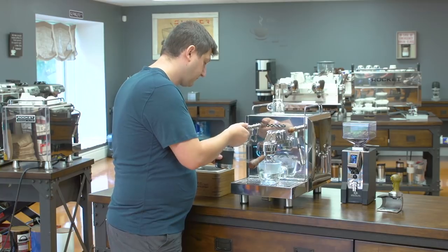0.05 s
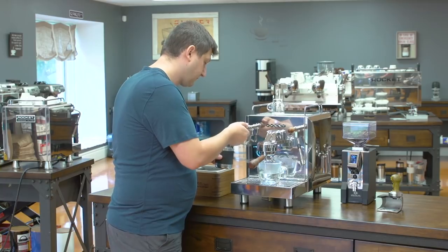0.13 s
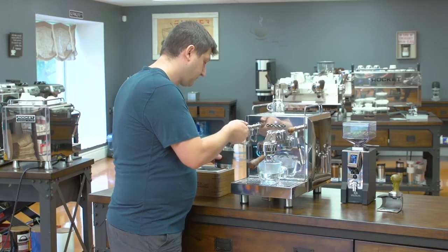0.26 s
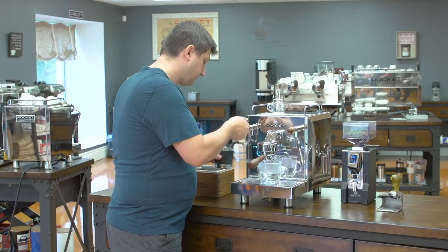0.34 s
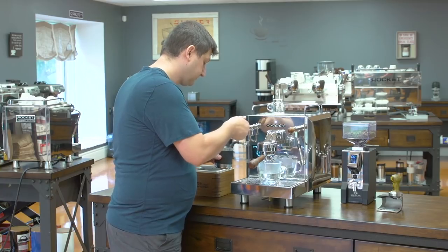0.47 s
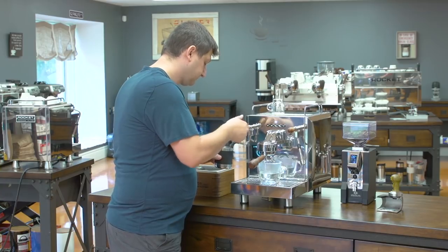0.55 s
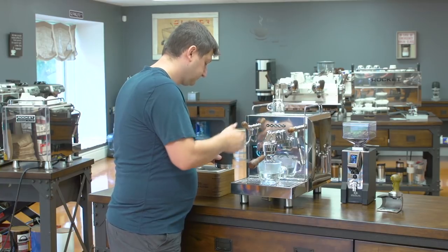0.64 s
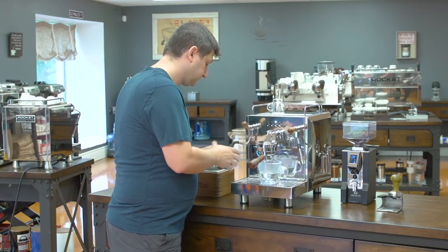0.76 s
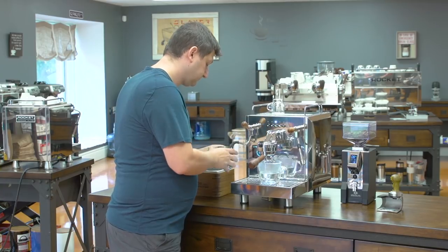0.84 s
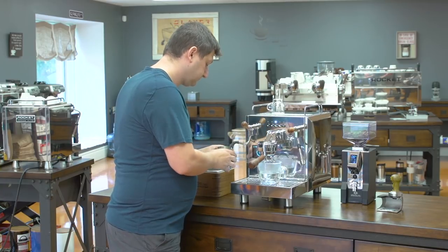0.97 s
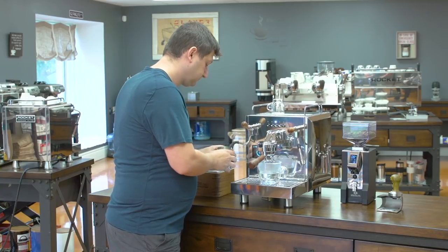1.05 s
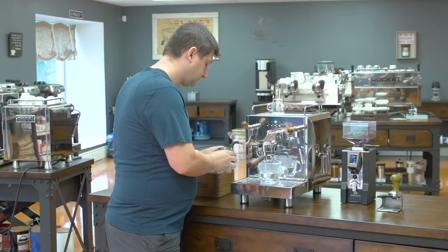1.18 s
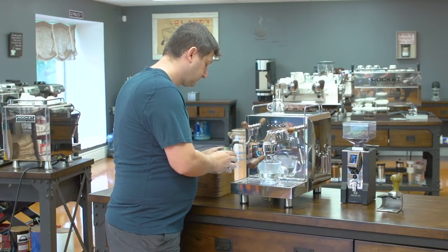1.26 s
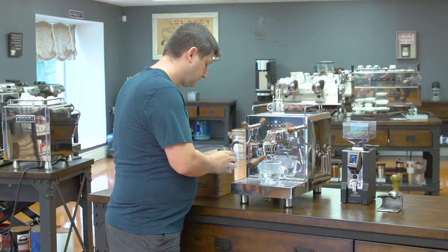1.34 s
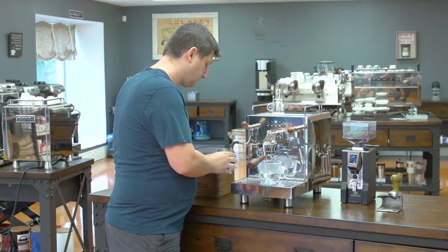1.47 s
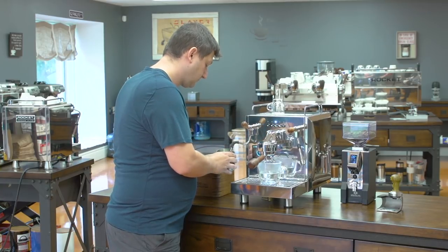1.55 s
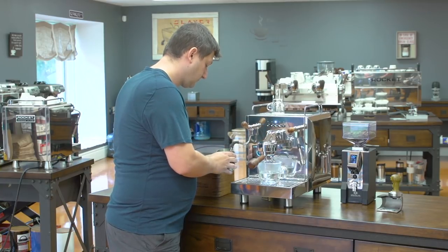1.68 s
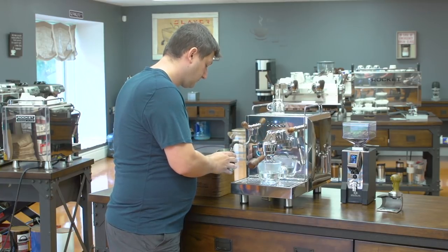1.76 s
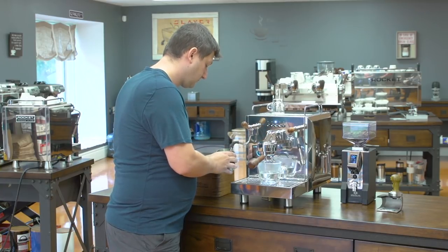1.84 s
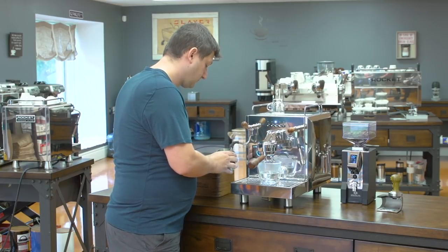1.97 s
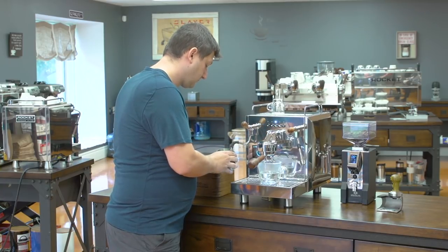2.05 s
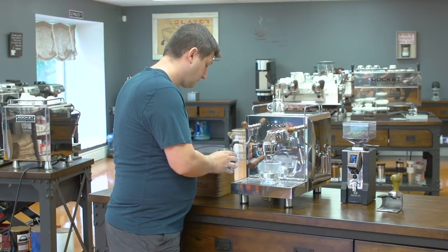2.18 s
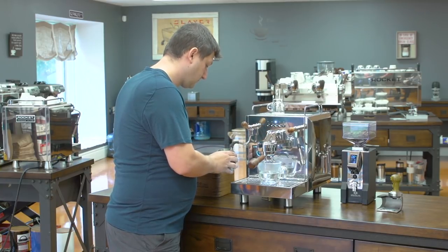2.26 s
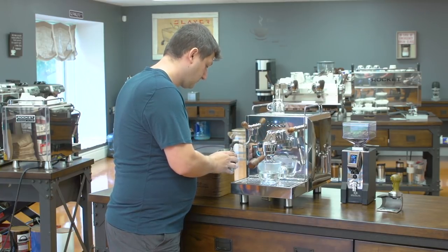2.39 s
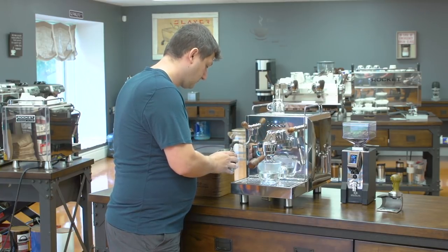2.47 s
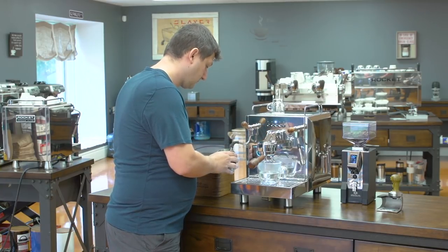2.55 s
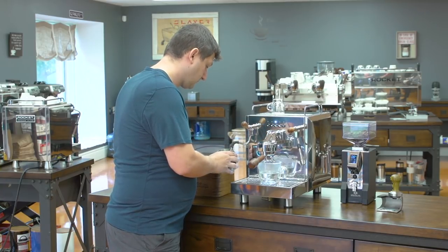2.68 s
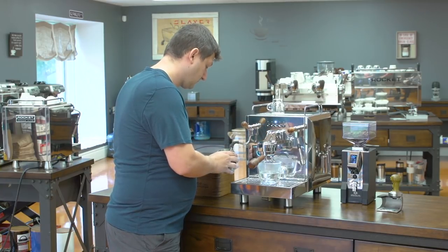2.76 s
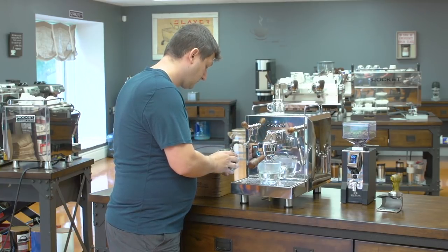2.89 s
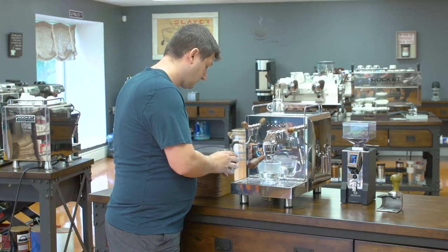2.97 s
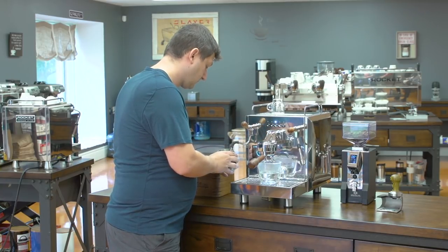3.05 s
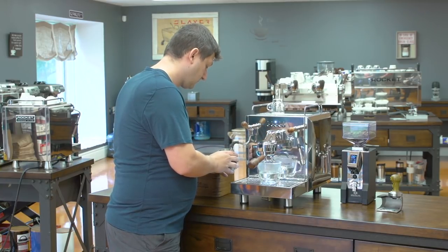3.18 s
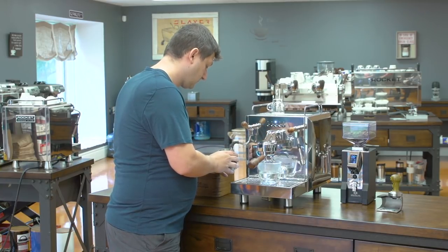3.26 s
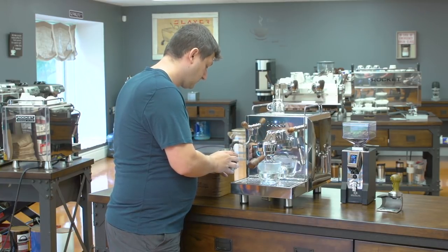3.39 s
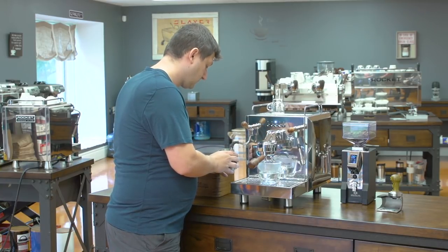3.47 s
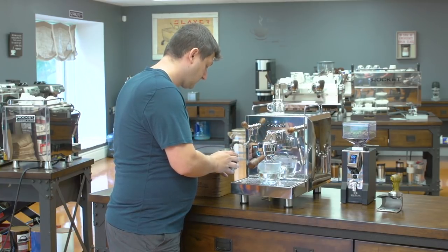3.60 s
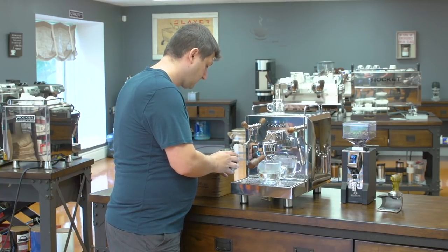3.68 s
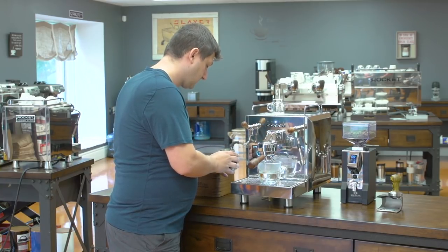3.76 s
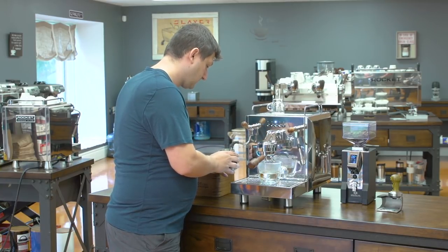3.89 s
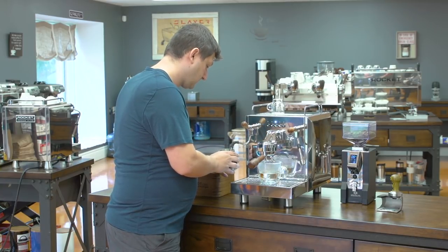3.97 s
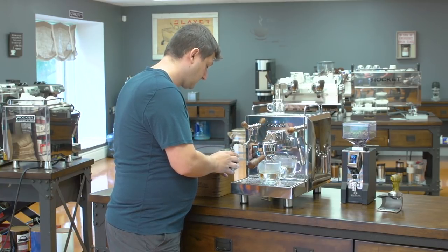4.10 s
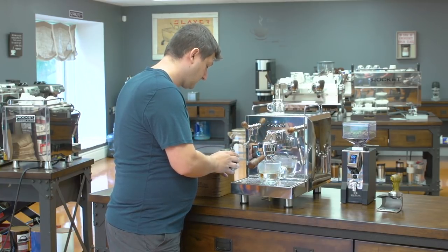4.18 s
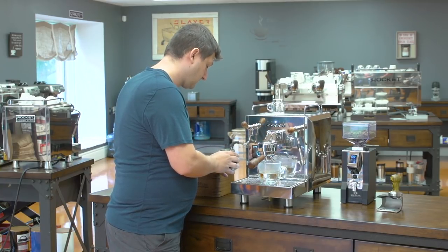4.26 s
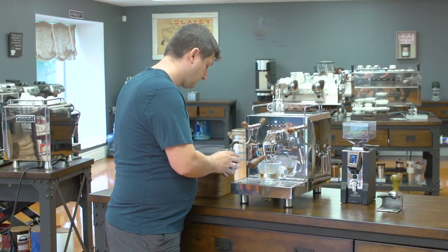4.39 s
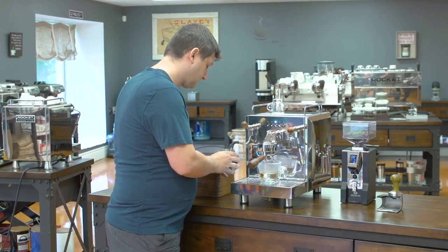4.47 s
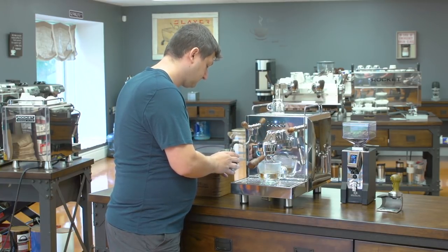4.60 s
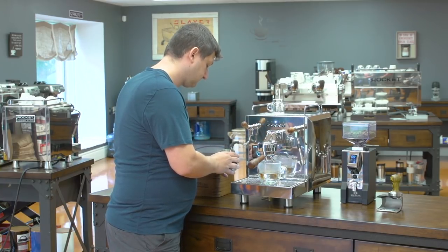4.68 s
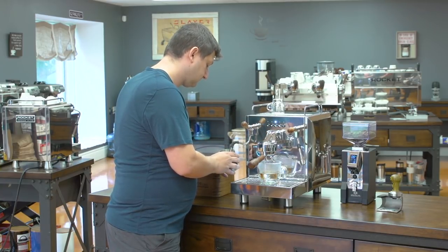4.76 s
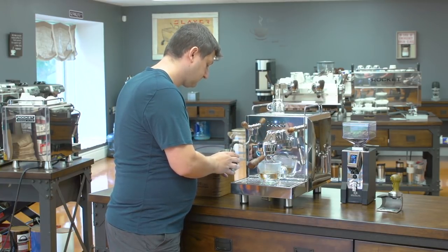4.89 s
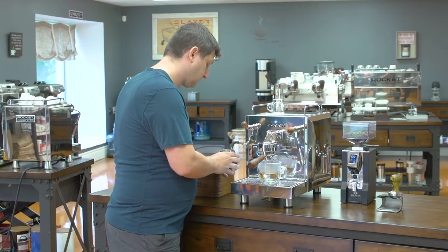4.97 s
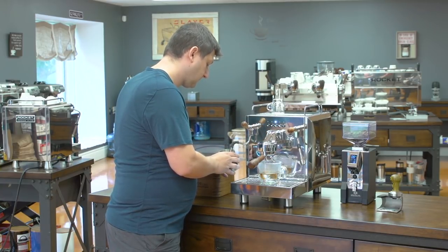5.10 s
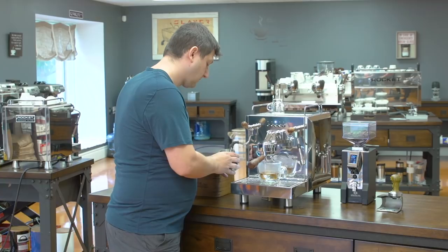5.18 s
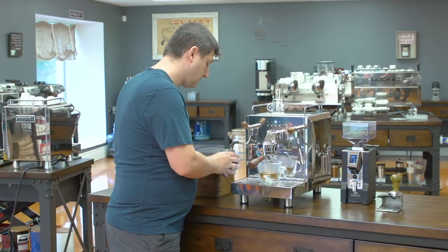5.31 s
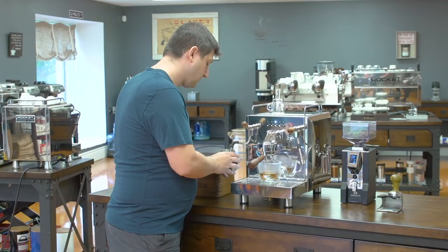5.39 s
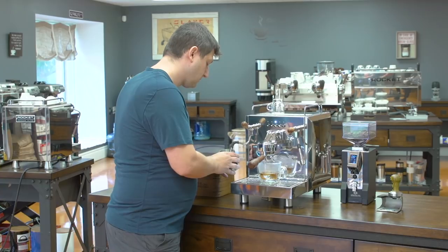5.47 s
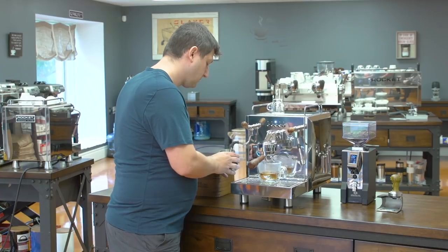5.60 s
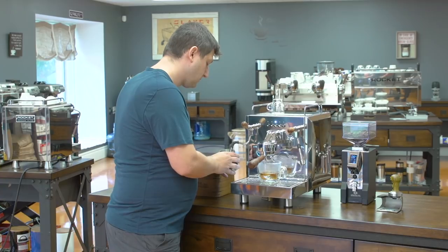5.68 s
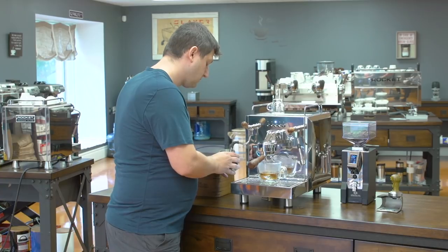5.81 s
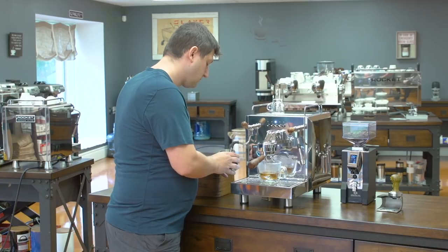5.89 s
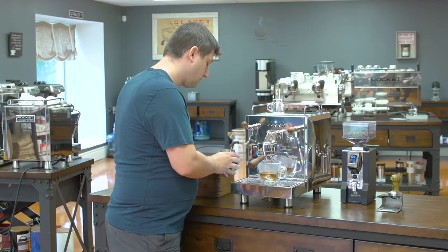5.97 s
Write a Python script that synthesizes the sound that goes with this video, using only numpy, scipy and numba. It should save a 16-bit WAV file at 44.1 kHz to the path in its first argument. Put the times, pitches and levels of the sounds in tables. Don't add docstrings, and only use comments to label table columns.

```python
import sys
import numpy as np
from scipy import signal
from scipy.fft import rfft, irfft
from scipy.io import wavfile
from scipy.ndimage import uniform_filter1d, minimum_filter1d
from numba import njit

SR = 44100
rng = np.random.default_rng(int(sys.argv[2]) if len(sys.argv) > 2 else 0)


def inscribe(sig):
    pcm = np.round(np.clip(np.atleast_2d(sig).T, -1, 1) * 32767)
    wavfile.write(sys.argv[1], SR, pcm.astype(np.int16))


def volts_from_db(level):
    exponent = np.asarray(level, float) / 20
    return 10 ** exponent


N = 266540
T = np.arange(N) / SR

# (start [s], end [s], hiss level [dB], nozzle whistle against the usual [dB])
BARED_SPELLS = [(1.584, 1.594, -25, 1), (1.594, 1.815, -26, 4.5), (1.815, 1.997, -17.5, 4.5),
                (2.03, 2.058, -34, -2), (2.061, 2.097, -17, -5), (2.142, 2.149, -37, 7),
                (2.16, 2.17, -38, 4), (2.196, 2.201, -38, 3), (2.391, 2.398, -35, 0),
                (2.505, 2.516, -31, 4), (2.513, 2.536, -40, 8.5), (2.537, 2.604, -25.5, 3),
                (2.607, 2.717, -24, 3.5), (2.717, 2.756, -27.5, 3), (2.765, 2.806, -27.5, 3),
                (2.805, 2.908, -24, 0), (2.909, 2.959, -37, 5), (2.96, 3.0, -48, 4),
                (3.004, 3.092, -21, -12), (3.112, 3.118, -17, -10), (3.154, 3.345, -21.5, -3.5),
                (3.445, 3.467, -46, 5), (3.8, 3.825, -29.5, 7), (3.841, 3.875, -27.5, 1),
                (4.196, 4.213, -28, 9), (4.373, 4.393, -42, 1), (4.74, 4.778, -24.5, 5.5),
                (4.808, 4.886, -24, 4.5), (4.938, 4.977, -24, 3), (4.994, 5.005, -22, 5),
                (5.033, 5.158, -26.5, 4.5), (5.35, 5.39, -44, 10), (5.39, 5.413, -36, 6),
                (5.41, 5.475, -22.5, 3.5), (5.545, 5.592, -25.5, 6), (5.596, 5.664, -24, 7.5),
                (5.671, 5.688, -29, 4), (5.697, 5.704, -21, 2), (5.738, 5.746, -27, 9),
                (5.746, 5.764, -37, 4), (5.765, 5.817, -23.5, 4), (5.823, 5.836, -32, 3),
                (5.841, 5.848, -31, -2), (5.912, 5.948, -21, 5), (5.956, 5.967, -24, 3),
                (6.004, 6.06, -20, 3)]
FULL_TEAR_DB = -26
STARVING_S = 0.036


def blast(surge):
    # (time [s], hollow tone [Hz], overtone [Hz], hiss crest [Hz], raggedness [factor on widths])
    hollow_size = [
        (.4, 447, 1320, 8500, 3),
        (.6, 607, 1430, 7200, 3.8),
        (.67, 674, 1550, 6300, 2.1),
        (.88, 798, 1730, 8100, 1.87),
        (1.25, 910, 1746, 7800, 1.6),
        (1.385, 900, 1750, 8230, 1.2),
        (1.41, 790, 1400, 7700, 1.8),
        (1.5, 850, 1600, 8000, 2.7),
        (1.62, 840, 1440, 8200, 9.1),
    ]
    # (time [s], jet level [dB], song of the hollow [dB])
    opening = [
        (.41, -30, -28),
        (.424, -18.5, -32),
        (.5, -18, -39),
        (.65, -14.5, -25.5),
        (.84, -13.5, -23),
        (.9, -13.5, -20),
        (1.0, -13, -20),
        (1.26, -11.5, -18.5),
        (1.5, -14.5, -21),
        (1.6, -21.5, -39),
    ]
    # (resonance [Hz], width [Hz], level [dB])
    jet_modes = [(6750, 570, 0), (7200, 410, -1.5), (7820, 410, -2), (8500, 730, 1.5), (9100, 930, -14),
                 (10340, 1200, -16), (11940, 1450, -15), (14100, 2800, -26.5)]
    # (resonance [Hz], width [Hz], level [dB])
    body_modes = [(3126, 140, 0), (3570, 430, -5), (4340, 930, -0.5), (5070, 370, 2.5), (5690, 1330, 4),
                  (2420, 2900, -10.5)]
    start, end = opening[0][0], opening[-1][0]
    jet, overtone = (volts_from_db(c) * (T > start) * (T < end) for c in curve(opening))

    wet_db, dry_db, wet_until_s, drying_s = -4.5, -10.5, 0.75, .03
    wet = np.clip((wet_until_s - T) / drying_s, 0, 1)
    body = jet * volts_from_db(dry_db + (wet_db - dry_db) * wet)

    low_db, fade_db_s, low_gulp_db = -6, -20, 2.2
    from_s, grow_s, best_s = .6, .1, .88
    low_level = volts_from_db(low_db + fade_db_s * np.abs(T - best_s) + low_gulp_db * walk(21.75))
    hollow = overtone * low_level * np.clip((T - from_s) / grow_s, .2, 1)

    low_hz, high_hz, crest_hz, ragged = curve(hollow_size)
    wobble = 1 + .016 * walk(45)
    out = jet * ring(collapse(surge, 0.94, 0.5, 2.05), jet_modes, drift=0.014, patchy_db=2.5)
    out += jet * volts_from_db(1) * sing(collapse(surge, .3, 1.2, 5.7), crest_hz, 900 * ragged)
    out += body * ring(collapse(surge, 0.66, 0.33, 1.5), body_modes, drift=0.014, patchy_db=3.5)
    out += hollow * sing(1, low_hz * (1 + .012 * walk(30)), 42 * ragged, steady=.35)
    out += overtone * volts_from_db(-8.5) * sing(collapse(surge, 0.2, 4.7, 0.96), .83 * high_hz, 450 * ragged)
    whistle = sing(collapse(surge, 0.21, 0.86, 0.39), high_hz * wobble, 135 * ragged, steady=0.17)
    gulp_db = 3.5
    return out + overtone * volts_from_db(gulp_db * walk(24.35)) * whistle


def roar(surge, hum):
    # (time [s], steam collapsing in the milk [dB], nearness of tip to surface [0-1])
    hand = [(1.36, -24.5, 0.088), (1.88, -18.5, 0.89), (2.02, -14.5, 0.58), (2.14, -15, .0),
            (2.3, -16, 0.83), (2.5, -16.5, 0.41), (2.78, -14, 0), (2.86, -22.5, 0.4), (2.98, -19, 0.06),
            (3.08, -20, .0), (3.4, -20.5, 0.084), (3.65, -18.5, 0.36), (4.48, -18, 0.56),
            (4.6, -19.5, 0.51), (4.72, -20, 0.49), (5.32, -19, 0.45), (5.52, -21, 0.072),
            (5.9, -20.5, 0.23)]
    # (time [s], half length [s], change of roar [dB])
    clumps = [(1.66, 0.011, -4), (1.775, 0.036, -2), (1.9, 0.052, -2.5), (2.016, .015, 1.5),
              (2.096, 0.017, -2), (2.215, .03, 3), (2.298, 0.023, 3.5), (2.45, 0.037, 4),
              (2.518, .015, 0.5), (2.58, .02, -4), (2.658, 0.025, 2.5), (2.705, .012, -4),
              (2.745, .02, 0.5), (2.875, .04, -6), (2.95, 0.018, 4.5), (2.989, 0.011, 8),
              (3.074, 0.042, -4.5), (3.14, 0.023, 3), (3.428, 0.015, 1.5), (3.54, 0.024, 1),
              (3.607, 0.016, 0.5), (3.734, 0.036, 1.5), (3.812, 0.011, -3), (3.884, 0.056, 3.5),
              (4.2, 0.0084, 0), (4.34, 0.035, -0.5), (4.443, 0.022, 0), (4.547, 0.048, -3.5),
              (4.705, 0.035, 1), (4.772, .015, -3.5), (4.93, 0.013, 1.5), (5.034, 0.01, -0.5),
              (5.078, 0.016, -4.5), (5.272, 0.021, 0), (5.309, 0.018, -7), (5.383, 0.017, 1),
              (5.525, .015, 1), (5.56, 0.017, -3), (5.714, 0.0091, 1.5), (5.813, 0.016, -4),
              (5.897, 0.018, 5), (6.0, .012, 0)]
    # (resonance [Hz], width [Hz], level [dB])
    milk_modes = [(1074, 117, 0), (1330, 233, 3), (1570, 330, 0), (730, 140, -18.5)]
    # (resonance [Hz], width [Hz], level [dB])
    pitcher_modes = [(2564, 470, -12.5), (3150, 80, -4), (3218, 180, 1.5), (3517, 340, -3),
                     (3720, 460, -10.5), (4280, 280, -7)]
    # (resonance [Hz], width [Hz], level [dB])
    coarse_modes = [(1870, 420, -8.5), (2524, 620, -1), (2980, 460, -1), (3090, 190, 3), (3720, 430, -1.5),
                    (4200, 270, -3.5), (4830, 320, -3.5)]
    # (resonance [Hz], width [Hz], level [dB])
    spout_modes = [(5330, 1400, -3.5), (5730, 190, -14.5), (6320, 360, -1), (7200, 1000, 3),
                   (8600, 890, -13)]
    # (resonance [Hz], width [Hz], level [dB])
    spray_modes = [(8640, 1450, 12.5), (11300, 1400, -6.5), (13400, 1300, -47), (15100, 1500, -24)]
    # (frequency [Hz], spectral density [dB per Hz])
    slosh = [(82, -49), (140, -9.5), (247, -28), (291, -26), (509, -7), (891, -4), (1000, -15), (1300, -29),
             (2200, -120)]

    steam_db, near = curve(hand)
    clump_db = sum(db * np.exp(-((T[::64] - s) / half) ** 2) for s, half, db in clumps)
    steam_db = steam_db + clump_db.repeat(64)[:N]
    out_of_milk, starved, gulf, thin = bared()
    begin_s, settle_s = hand[0][0], 0.29
    on = T > begin_s
    approach_near = 0.27
    near = near * np.clip((T - begin_s) / settle_s, 0, 1) + approach_near * thin

    starve_db, gulf_db = -4.5, -4
    pitcher = on * volts_from_db(steam_db + starve_db * starved + gulf_db * gulf)
    milk = pitcher * volts_from_db(-11.5 + 1.5 * starved)
    spout_db = -28.5 + 7 * near + 0.35 * (steam_db + 21.0)
    spout = on * volts_from_db(spout_db - 0.5 * out_of_milk - 2 * (starved - out_of_milk))
    spray = on * volts_from_db(-45.5 + 28 * near)

    coarse_from_s, grow_s, coarse_until_s, fining_s = 1.29, 0.75, 2.81, 0.31
    growth = 1.08 * np.clip((T - coarse_from_s) / grow_s, 0, 1)
    coarse = np.clip(growth * np.exp(-np.maximum(T - coarse_until_s, 0) / fining_s), 0, 1)
    force = collapse(surge, 0.66, 0.3, 1.93)
    out = pitcher * np.sqrt(1 - coarse) * ring(force, pitcher_modes, drift=0.0018, patchy_db=2.0)
    out += pitcher * np.sqrt(coarse) * ring(force, coarse_modes, drift=0.025, patchy_db=3.5)
    out += milk * ring(collapse(surge, 0.11, 0.15, 2.7), milk_modes, drift=0.0065, patchy_db=-0.54)
    out += spout * volts_from_db(2.0) * ring(collapse(surge, 0.6, 1.7, 2.13), spout_modes, patchy_db=2.0)
    out += spray * ring(collapse(surge, 1.4, 1.5, 2.5), spray_modes, patchy_db=1.1)
    slosh_level = volts_from_db(10.0) * hum * (T > .4) * volts_from_db(0.73 * walk(11) + 0.82 * surge)
    return out + slosh_level * colour(slosh)


def tears(surge):
    # (resonance [Hz], width [Hz], level [dB])
    air_modes = [(11570, 700, 2), (12370, 520, 4), (13650, 600, 2), (14760, 940, -4.5), (15750, 690, -3)]
    # (resonance [Hz], width [Hz], level [dB])
    nozzle_modes = [(7380, 930, -2.5), (8190, 390, 5.5), (8660, 240, -1)]
    # (resonance [Hz], width [Hz], level [dB])
    edge_modes = [(8980, 380, -1), (9540, 900, 0.7), (10300, 1050, -0.91), (10880, 460, -1.2)]
    whistle_gain_db, edge_gain_db = 3, 3
    faint_lift, edge_swap = 0.41, 0.11
    rise_db_s, sputter_db_s = 4, 8
    lead_s, lead_db, linger_s, linger_db = .01, -22, 0.022, -21

    gate = np.zeros((3, N))
    lapping = np.minimum(walk(110), 0)
    for start, end, db, whistle_db in BARED_SPELLS:
        on = slice(int((start - .1) * SR), int((end + .15) * SR))
        t = T[on]
        lift = faint_lift * (FULL_TEAR_DB - db)
        nozzle_db = whistle_gain_db + lift + whistle_db
        edge_db = edge_gain_db + lift / 2 - edge_swap * whistle_db
        above = np.array([[0], [nozzle_db], [edge_db]])
        full = min((end - start) / STARVING_S, 1)
        before = volts_from_db(lead_db) * np.exp((t - start) / lead_s / full)
        held = volts_from_db(rise_db_s * (t - (start + end) / 2) + sputter_db_s * (t - start) * lapping[on])
        after = volts_from_db(linger_db) * np.exp((end - t) / linger_s / full)
        shape = np.where(t < start, before, np.where(t < end, held, after))
        gate[:, on] = np.maximum(gate[:, on], volts_from_db(db + above) * shape)
    sputter = unit(volts_from_db(0.41 * walk(40) + 2.2 * walk(180) + 2.2 * walk(600)))
    gate = uniform_filter1d(gate, size=24) * sputter

    parts = [ring(collapse(surge, 0.36, 1.0, 0.88), modes, drift=0.006, patchy_db=2)
             for modes in (air_modes, nozzle_modes, edge_modes)]
    rush = volts_from_db(-5.5) * ring(collapse(surge, 0.32, 1.0, 1.1), [(11700, 1300, 1), (13860, 1800, -2.5)])
    plops = volts_from_db(-28) * ring(collapse(surge, .3, 1.5, 3.8), [(302, 230, -3), (604, 450, 0)])
    return np.sum(gate * parts, axis=0) + gate[0] * (plops + rush)


def valve():
    # (time [s], peak level [dB], frequency [Hz], decay time by 60 dB [s])
    knocks = [
        (0.376, -5, 1150, 0.016),
        (.376, -23, 1750, 0.022),
        (.385, -29, 280, 0.14),
        (0.403, -25, 325, 0.11),
        (.413, -10.5, 1104, 0.049),
        (0.425, -10, 1400, 0.023),
        (.435, -26, 364, 0.1),
        (.463, -20, 1240, 0.073),
        (.485, -33, 1214, 0.056),
    ]
    # (time [s], length [s], first frequency [Hz], last
    # frequency [Hz], rms level [dB])
    slurps = [(.42, .055, 4500, 4600, -23), (.47, .06, 1250, 1200, -29), (.5, .14, 800, 1080, -33),
              (.501, .077, 3350, 3000, -30), (.51, .05, 1700, 1800, -29), (.53, .06, 1550, 1940, -24),
              (.55, .05, 1300, 1420, -27), (.595, .06, 2100, 2750, -30), (.635, .054, 880, 1320, -27),
              (.63, .08, 2750, 3150, -27), (.62, .08, 4500, 3900, -28), (.57, .04, 1850, 2100, -28),
              (.66, .05, 1730, 1770, -28), (.69, .08, 1150, 1300, -31), (.7, .042, 1500, 1470, -29),
              (.72, .04, 3900, 3700, -30), (.79, .07, 3450, 3670, -28), (1.56, .035, 3050, 3100, -25),
              (1.375, .04, 3100, 3120, -27), (1.405, .04, 1450, 1270, -26), (1.44, .075, 1300, 1640, -23),
              (1.9, .038, 3100, 3150, -25), (2.47, .075, 2600, 2240, -24), (2.065, .04, 520, 700, -39),
              (2.22, .07, 3100, 2700, -24), (2.42, .07, 3000, 2600, -25), (2.33, .05, 1650, 1500, -27)]
    out = np.zeros(N)
    for s, db, hz, t60 in knocks:
        t = np.maximum(T - s, 0)
        out += volts_from_db(db - 60 * t / t60) * (1 - np.exp(-t / 0.0023)) * np.sin(2 * np.pi * hz * t)
    for s, length, hz0, hz1, db in [*slurps, *drops()]:
        way = np.linspace(0, 1, int(length * SR))
        gulp = unit(svf(rng.standard_normal(len(way)), hz0 + (hz1 - hz0) * way, 190 + 0 * way))
        out[int(s * SR):][:len(way)] += volts_from_db(db) * np.sin(np.pi * way) * gulp
    after = np.maximum(T - .374, 0)
    spit = (T > .374) * (T < .417) * (volts_from_db(-33.0) + volts_from_db(-23.5) * np.exp(-after / 0.0046))
    gurgle = (T > .378) * volts_from_db(-29.5) * np.exp(-after / 0.17)
    out += spit * ring(1, [(5300, 1700, 6), (8200, 1700, 5.0), (3340, 1200, -8)])
    return out + gurgle * ring(1, [(354, 210, -2.2), (750, 850, -0.84)])


def drops():
    count, from_s, until_s = 70, .43, 1.55
    low_hz, high_hz = 2600, 6300
    level_db, rise_share, length_s = -36, .07, .045
    when, pitch, size, rise = rng.random((count, 4)).T
    start = from_s + (until_s - from_s) * when ** 1.4
    hz = low_hz * (high_hz / low_hz) ** pitch
    last_hz = hz * (1 + rise_share * (2 * rise - .6))
    return list(zip(start, length_s * (0.41 + size), hz, last_hz, level_db + 6 * size))


def machine(hum):
    # (frequency [Hz], level above the hum [dB])
    pump_lines = [(120, -1), (241, -5.5), (685.3, -5.5), (1095, 9.5), (1200, 1), (2290, -2), (1080, -4),
                  (1050, -3), (806, 0), (852, -7), (1220, 4)]
    # (resonance [Hz], width [Hz], level [dB])
    panel_modes = [(2276, 33, -3), (5700, 74, -13), (7610, 120, 3.5), (8900, 120, -2), (10200, 46, -15),
                   (12900, 140, -15), (13600, 44, -10), (14200, 120, -18)]
    # (frequency [Hz], spectral density [dB per Hz])
    kitchen = [(18, -49), (30, -12.5), (193, -16), (244, -14), (496, -12), (628, -16.5), (816, -10),
               (907, -16), (1060, -9.5), (1420, -22.5), (6310, -20.5), (7780, -17.5), (12200, -27.5),
               (13200, -21), (15800, -41)]
    lines = sum(volts_from_db(db + .7 * walk(12)) * np.sin(2 * np.pi * hz * T + .15 * walk(6)) for hz, db in pump_lines)
    panels = volts_from_db(9.5) * ring(1, panel_modes, drift=.001, patchy_db=1.5)
    return hum * (np.sqrt(2) * lines + panels + volts_from_db(13.5) * colour(kitchen))


def ducking(bright):
    hum_db, duck_db, fall_s, loud_hiss_db = -56.5, -7, 0.12, -18.5
    keep = np.exp(-1 / (fall_s * SR))
    recent = np.sqrt(signal.lfilter([1 - keep], [1, -keep], bright ** 2)) / volts_from_db(loud_hiss_db)
    return volts_from_db(hum_db + duck_db * np.tanh(recent))


def bared():
    faint_db, refill_s, gulf_s, approach_s = -31, 0.091, 0.24, 0.033
    out = np.zeros((4, N))
    for start, end, db, _ in BARED_SPELLS:
        size = np.clip((db - faint_db) / (FULL_TEAR_DB - faint_db), 0, 1) * min((end - start) / STARVING_S, 1)
        on = T > start
        out_of_milk = on * (T < end)
        starved = on * np.exp(-np.maximum(T - end, 0) / refill_s)
        gulf = on * np.exp(-np.abs(T - start) / gulf_s)
        thin = (T < end) * np.exp(np.minimum(T - start, 0) / approach_s)
        out = np.maximum(out, size * np.array([out_of_milk, starved, gulf, thin]))
    return uniform_filter1d(out, size=300)


def collapse(surge, share, flicker_db, grain_db):
    return volts_from_db(share * surge + flicker_db * walk(25.09) + grain_db * walk(300))


def ring(force, modes, drift=0.033, patchy_db=-1.0):
    out = 0
    for hz, width, db in modes:
        shake = force * rng.standard_normal(N) * volts_from_db(db + patchy_db * walk(22.117))
        out = out + svf(shake, hz * (1 + drift * walk(9)), np.full(N, 1.5 * width))
    return unit(out)


def sing(force, hz, width, steady=0.):
    tone = unit(svf(force * rng.standard_normal(N), hz, width))
    return unit(tone / (uniform_filter1d(np.abs(tone), size=300) + 0.12) ** steady)


@njit
def svf(x, hz, width):
    y = np.empty(len(x))
    b, l, b2, l2 = 0., 0., 0., 0.
    for i in range(len(x)):
        g, k = np.tan(np.pi * hz[i] / SR), width[i] / hz[i]
        a = 1 / (1 + g * (g + k))
        v = (b + g * (x[i] - l)) * a
        w = (b2 + g * (k * v - l2)) * a
        b, l = 2 * v - b, l + 2 * g * v
        b2, l2 = 2 * w - b2, l2 + 2 * g * w
        y[i] = k * w
    return y


def colour(points):
    hz, db = np.transpose(points)
    log_hz = np.log(np.arange(N // 2 + 1) * SR / N + 1)
    return unit(irfft(rfft(rng.standard_normal(N)) * volts_from_db(np.interp(log_hz, np.log(hz), db)), N))


def walk(rate):
    k = int(SR / rate)
    held = np.repeat(rng.standard_normal(N // k + 1), k)
    return unit(uniform_filter1d(uniform_filter1d(held, k), k)[:N])


def unit(x):
    return x / np.sqrt(np.mean(x ** 2))


def curve(table):
    s, *columns = np.transpose(table)
    return [np.interp(T, s, c) for c in columns]


def scene():
    # (frequency [Hz], width [Hz], depth [dB])
    shadow = [(6300, 225, -8), (4960, 180, -6.5)]
    surge = 1.1 * walk(14) + 1.7 * walk(60)
    bright = blast(surge) + tears(surge)
    hum = ducking(bright)
    near = bright + roar(surge, hum) + valve()
    for hz, width, db in shadow:
        peak = signal.lfilter(*signal.iirpeak(hz, hz / width, fs=SR), near)
        near = near - (1 - volts_from_db(min(db, 0))) * peak
    tail = rng.standard_normal(SR // 4) * volts_from_db(-60 * T[:SR // 4] / 0.25)
    tail = signal.sosfilt(signal.butter(1, 3000, fs=SR, output="sos"), tail)
    echo = signal.fftconvolve(near, tail / np.sqrt(np.sum(tail ** 2)))[:N]
    return (near + volts_from_db(-17.5) * echo + machine(hum))[None]


def band_limit(x):
    return signal.sosfilt(signal.butter(12, 16000, fs=SR, output="sos"), x)


def record(dry):
    ceiling_db, top_hz = -4.6, 15760
    need = np.minimum(1, volts_from_db(ceiling_db) / (np.abs(dry) + 1e-9))
    held = dry * uniform_filter1d(minimum_filter1d(need, size=221), size=221)
    thin = signal.sosfilt(signal.butter(2, 55, "high", fs=SR, output="sos"), held)
    cut = signal.sosfilt(signal.ellip(12, .3, 80, top_hz, fs=SR, output="sos"), thin)
    return band_limit(cut)


dry = scene()
out = record(dry)
inscribe(out)
```